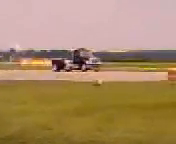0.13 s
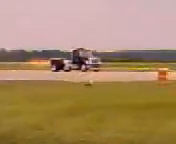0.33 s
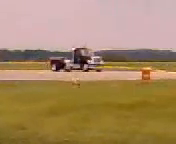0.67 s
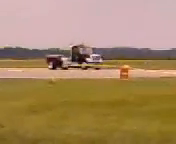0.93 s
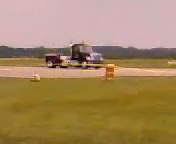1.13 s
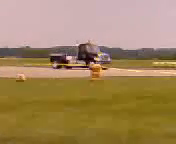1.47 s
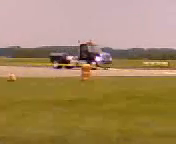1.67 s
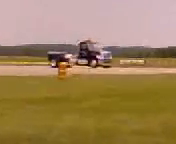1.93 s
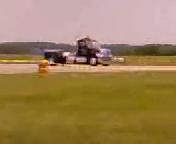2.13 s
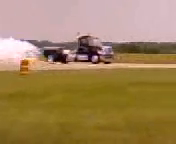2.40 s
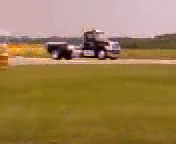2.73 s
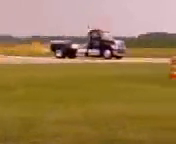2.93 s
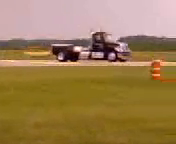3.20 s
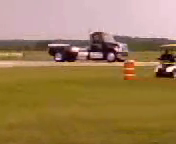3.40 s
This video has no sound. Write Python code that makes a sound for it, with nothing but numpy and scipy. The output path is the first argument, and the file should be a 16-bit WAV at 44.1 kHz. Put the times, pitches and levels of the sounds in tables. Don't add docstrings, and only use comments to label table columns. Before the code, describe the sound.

Distant truck-mounted jet engine whistles and hisses, with two bursts of booming, crackling afterburner flame.

```python
import sys
import numpy as np
from scipy import signal
from scipy.fft import rfft, irfft, next_fast_len
from scipy.io import wavfile
from scipy.ndimage import uniform_filter1d

SR = 44100
rng = np.random.default_rng(int(sys.argv[2]) if len(sys.argv) > 2 else 0)


def volts_from_db(level):
    exponent = np.asarray(level, float) / 20
    return 10 ** exponent


def materialize(psi):
    bounded = np.clip(np.atleast_2d(psi).T, -1, 1)
    quanta = np.round(bounded * 32767).astype(np.int16)
    wavfile.write(sys.argv[1], SR, quanta)


N = 157437


def curve(rows, col=1):
    rows = np.array(rows, float)
    times, values = rows[:, 0], rows[:, col]
    return np.interp(np.arange(N) / SR, times, values, left=values[0], right=values[-1])


def unit(x):
    return x / np.sqrt(np.mean(x ** 2))


def band(x, hz, width_hz):
    return signal.lfilter(*signal.iirpeak(hz, hz / width_hz, fs=SR), x)


def walk(rate):
    hold = int(SR / rate)
    held = rng.standard_normal(2000)[np.arange(N) // hold]
    smooth = uniform_filter1d(uniform_filter1d(held, hold), hold)
    return unit(np.tanh(unit(smooth) / 2))


def coloured(points, flicker_db, rate):
    size = next_fast_len(N)
    hz = np.maximum(np.fft.rfftfreq(size, 1 / SR), 1)
    point_hz, point_db = np.array(points, float).T
    level_db = np.interp(np.log(hz), np.log(point_hz), point_db, left=-90, right=-90)
    spectrum = rfft(rng.standard_normal(size)) * volts_from_db(level_db)
    out, neighbour = 0, walk(rate)
    for octave in np.arange(4, 12.5, .5):
        own = walk(rate)
        window = np.cos(np.pi * np.clip(np.log2(hz) - octave, -.5, .5)) ** 2
        flicker = volts_from_db(flicker_db * (own + neighbour) / np.sqrt(2))
        out = out + flicker * irfft(spectrum * window, size)[:N]
        neighbour = own
    return unit(out)


def swells(rows, edge_s):
    t = np.arange(N) / SR
    total = 0
    for start, length, db in rows:
        to_nearest_edge = np.minimum(t - start, start + length - t)
        total = total + volts_from_db(db) * np.clip(to_nearest_edge / edge_s + .5, 0, 1)
    return total


def strikes(rows, hz, width_hz, column=1):
    def ring(x):
        return band(band(x, hz, width_hz), hz, 3.0 * width_hz)

    hits = np.zeros(N)
    for row in rows:
        hits[int(row[0] * SR)] = volts_from_db(row[column])
    one_hit_peak = np.max(np.abs(ring(np.eye(1, 2000)[0])))
    return ring(hits) / one_hit_peak


# [start_s, hiss_db, scattered_tone_above_hiss_db]
FLOW = [(0, -33, -3), (.04, -32, 8.5), (.7, -33, 4.5), (.86, -33.5, 6), (1.1, -29.5, 2.5), (1.75, -31, 4),
        (2.0, -29, 3), (2.25, -28, 4), (2.45, -28.5, 0), (2.58, -30, -1.5), (2.62, -27, 4.5),
        (2.72, -27.5, 5.5), (2.9, -24, 1), (3.1, -26.5, 4.5), (3.27, -21, 2.5), (3.43, -27, -0.5),
        (3.55, -30.5, 2)]
# [pitch_hz, level_db]
HISS = [(20, -27.5), (400, -19), (800, -13), (1700, -9), (2500, -5), (2950, 2.5), (3300, -3), (4700, -44)]
# [start_s, length_s, level_db]
PUFF = [
    (1.78, 0.07, -34.5),
]


def intake():
    hump_hz, hump_width_hz = 2168, 404
    hump = band(rng.standard_normal(N), hump_hz, hump_width_hz)
    hump = unit(band(hump, hump_hz, hump_width_hz))
    hump = hump * volts_from_db(curve(FLOW, 2) + 2.1 * walk(40))
    puff = unit(band(rng.standard_normal(N), 1510, 350)) * swells(PUFF, .03)
    hiss = volts_from_db(0.5) * coloured(HISS, 2.1, 25)
    return volts_from_db(curve(FLOW)) * (hiss + hump) + puff


# [start_s, pitch_hz]
SPOOL = [
    (0, 2222),
    (.45, 2197),
    (.7, 2182),
    (.88, 2190),
    (1.1, 2218),
    (1.35, 2226),
    (2.4, 2211),
    (3.1, 2178),
    (3.35, 2168),
    (3.57, 2186),
]
# [start_s, level_db]
CARRY = [(0, -31.5), (.14, -18.5), (.44, -22.5), (.455, -16), (.64, -15.5), (.96, -11), (1.01, -11.5),
         (1.22, -17.5), (1.27, -21.5), (1.73, -19.5), (1.78, -34.5), (2.35, -18), (2.53, -32),
         (2.66, -17.5), (2.9, -22.5), (3.35, -12.5), (3.46, -19), (3.57, -12)]
# [start_s, length_s, level_db]
STAGE = [
    (.9, .35, -36),
    (2.5, 0.12, -33),
    (2.97, .2, -32.5),
    (3.318, .17, -25),
]
# [start_s, length_s, level_db]
STALL = [
    (3.128, .055, -21),
    (3.194, .028, -14),
    (3.222, .02, -20),
    (3.243, .024, -14.5),
    (3.268, .036, -17),
]


def whistle():
    wobble_hz, stage_ratio = 4, 1.285
    stall_beat_hz, stall_crest_s = 84.7, 3.2495
    turn = 2 * np.pi * np.cumsum(curve(SPOOL) + wobble_hz * walk(40)) / SR
    flutter = volts_from_db(1.3 * walk(40) + 1.4 * walk(110))
    tone = np.sin(turn) * flutter * volts_from_db(curve(CARRY))
    stage = np.sin(stage_ratio * turn) * volts_from_db(2.5 * walk(60)) * swells(STAGE, .05)
    beat = 2 * np.pi * stall_beat_hz * (np.arange(N) / SR - stall_crest_s)
    stall = np.sin(turn - beat) * swells(STALL, .007)
    return np.sqrt(2) * (tone + stage + stall)


# [start_s, peak_db]
CRACKS = [
    (.045, -11),
    (.065, -18),
    (2.614, -4.5),
    (2.912, -8),
    (3.13, -9),
]


def ignition_cracks():
    return strikes(CRACKS, 2050, 360)


# [start_s, boom_db, snap_db]
POPS = [(.041, -13.5, -16), (.049, -12, -15.5), (.064, -20, -10.5), (.071, -15.5, -17), (.093, -15, -15),
        (.177, -19, -26), (.199, -12.5, -21), (.259, -16, -22.5), (.378, -15, -16.5), (.652, -18, -19.5),
        (.762, -23, -20), (2.505, -39.5, -43), (2.617, -15, -26.5), (2.72, -10, -17.5), (2.746, -8, -17),
        (2.825, -19.5, -24), (2.843, -13.5, -23), (3.001, -7, -17), (3.049, -17, -22), (3.09, -34, -15),
        (3.11, -10, -13), (3.385, -23.5, -35), (3.489, -31.5, -36)]


def big_pops():
    boom = strikes(POPS, 271, 55)
    snap = strikes(POPS, 855, 200, column=2)
    return volts_from_db(-1.5) * (boom + snap)


# [pitch_hz, width_hz, level_db]
PIPE = [
    (284, 44, -7),
    (186, 33, -5.5),
    (420, 120, -8.5),
    (790, 63, -17),
]


def tailpipe(pops):
    return sum(volts_from_db(db) * band(pops, hz, width_hz) for hz, width_hz, db in PIPE)


# [start_s, boom_db, crackle_above_boom_db]
FLAMES = [
    [(.026, -55, -2), (.04, -14, -7.5), (.1, -26, -6), (.42, -24.5, -9.5), (.56, -32.5, 1),
     (.66, -27.5, 1.5), (.77, -28, 4), (.88, -45, -0.5), (1.0, -54, -6.5)],
    [(2.6, -48, 0), (2.617, -22.5, -5.5), (2.7, -24.5, -2.5), (2.75, -21.5, -7.5), (2.93, -25, -7.5),
     (3.28, -26, -8), (3.39, -32, -9.5), (3.43, -41, -10), (3.57, -58.5, -11.5)],
]
# [pitch_hz, level_db]
FLAME_LOW = [(20, -14), (60, -14.5), (123, -16.5), (175, -10), (266, 2.5), (392, -11), (700, -24)]
# [pitch_hz, level_db]
FLAME_HIGH = [(450, -13), (650, 0), (860, -1), (1150, -8.5), (1600, -6), (2300, 0), (3300, -11.5),
              (4700, -46)]


def afterburner():
    t = np.arange(N) / SR
    pops_per_s, pop_spread_db = 500, 2
    chance, size_draw, sign_draw = rng.random((N, 3)).T
    size = volts_from_db(-pop_spread_db * np.log(size_draw + 0.0095)) * np.sign(sign_draw - .5)
    pops = (chance < pops_per_s / SR) * size
    lumps = volts_from_db(3.0 * walk(80))
    ringing = volts_from_db(-2.5) * unit(tailpipe(pops))
    low = unit(ringing + coloured(FLAME_LOW, 3.3, 45) * lumps)
    snaps = volts_from_db(-10.5) * unit(band(band(pops, 880, 300), 880, 900))
    high = coloured(FLAME_HIGH, 4.1, 50) * lumps + snaps
    out = 0
    for flame in FLAMES:
        lit = (t >= flame[0][0]) * (t <= flame[-1][0])
        out = out + volts_from_db(curve(flame)) * (low + volts_from_db(curve(flame, 2)) * high) * lit
    return out + big_pops()


def scene():
    dip_db, dip_s = -19, 0.011
    flame = afterburner()
    power = uniform_filter1d(flame ** 2, int(dip_s * SR))
    dip = (1 + (power / volts_from_db(2 * dip_db)) ** 2) ** .25
    mix = (whistle() + intake()) / dip + flame + ignition_cracks()
    return mix[None]


def band_limit(x):
    return signal.sosfilt(signal.butter(12, 15800, fs=SR, output="sos"), x)


def record(dry):
    top_hz, clip = 4834, .7
    lead = 400
    low_pass = signal.cheby2(10, 50, top_hz, fs=SR, output="sos")
    x = signal.sosfilt(low_pass, np.pad(dry, [(0, 0), (lead, 0)], "reflect"))
    mix = np.clip(x[:, lead:], -clip, clip)
    return band_limit(mix)


dry = scene()
out = record(dry)
materialize(out)
```